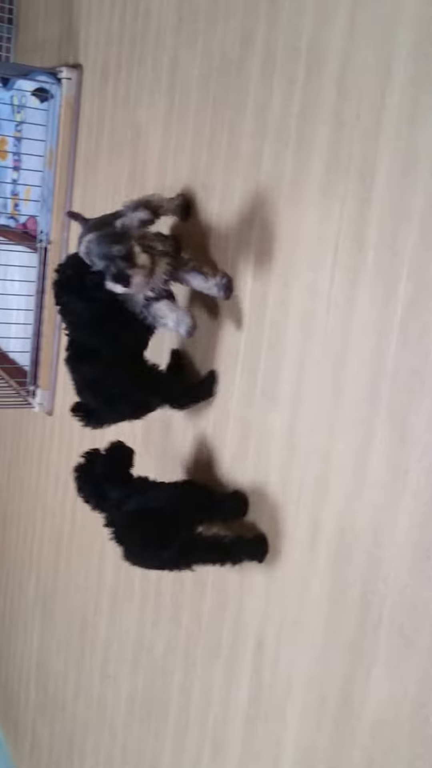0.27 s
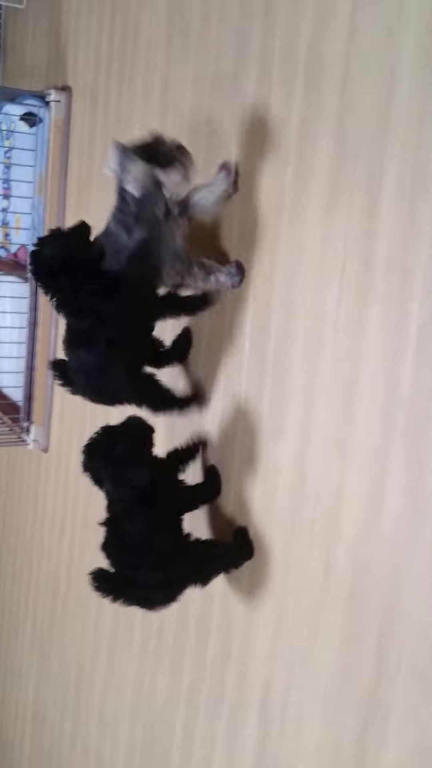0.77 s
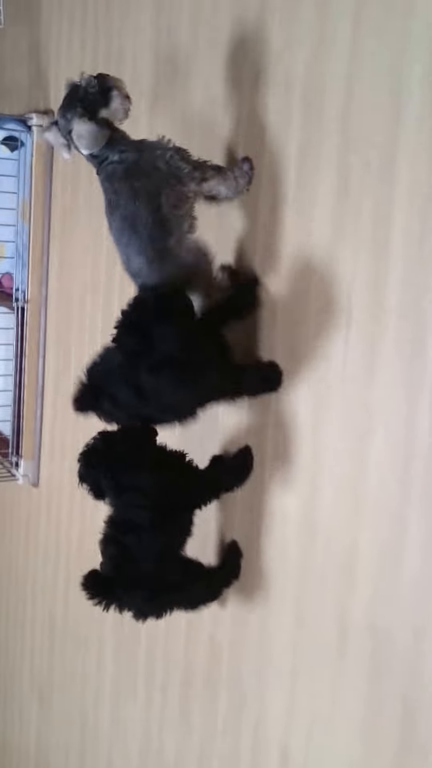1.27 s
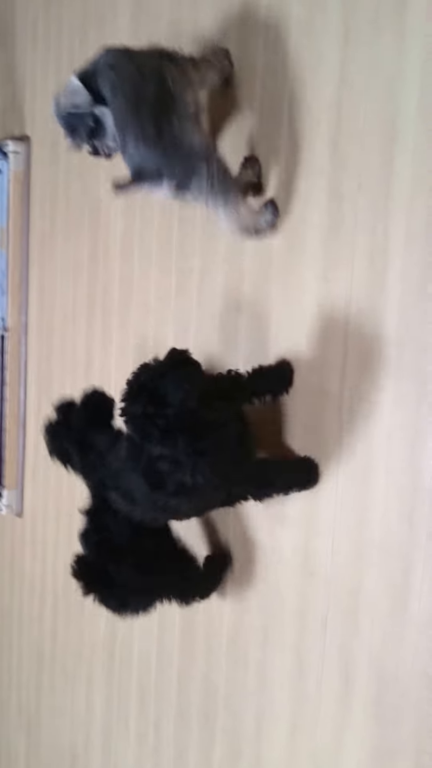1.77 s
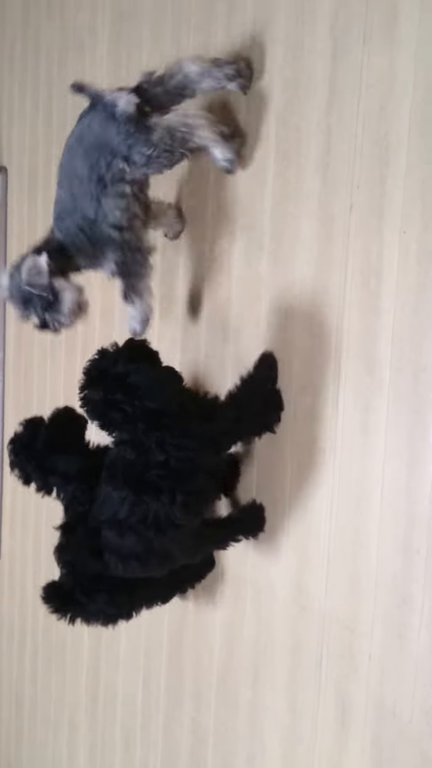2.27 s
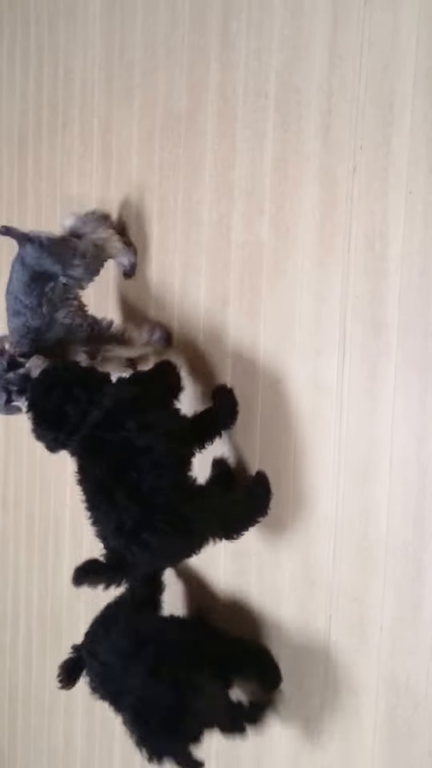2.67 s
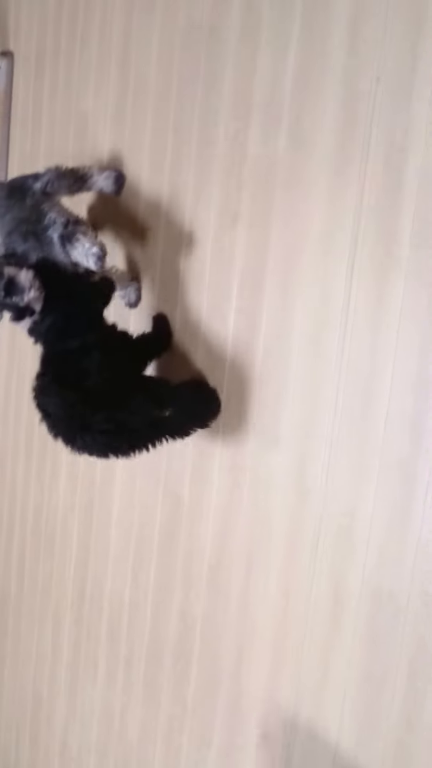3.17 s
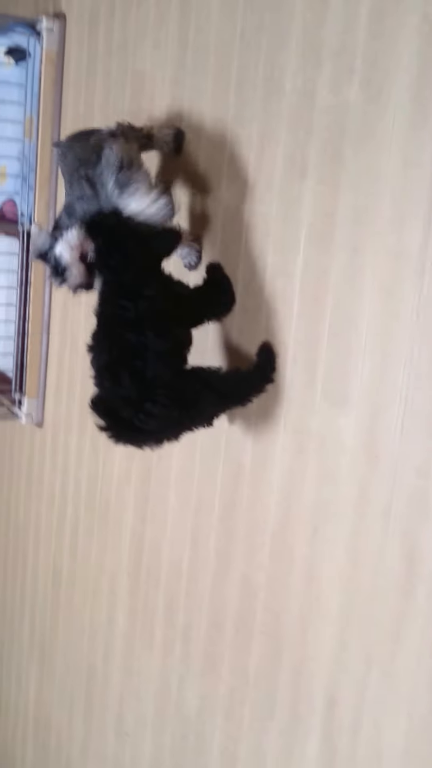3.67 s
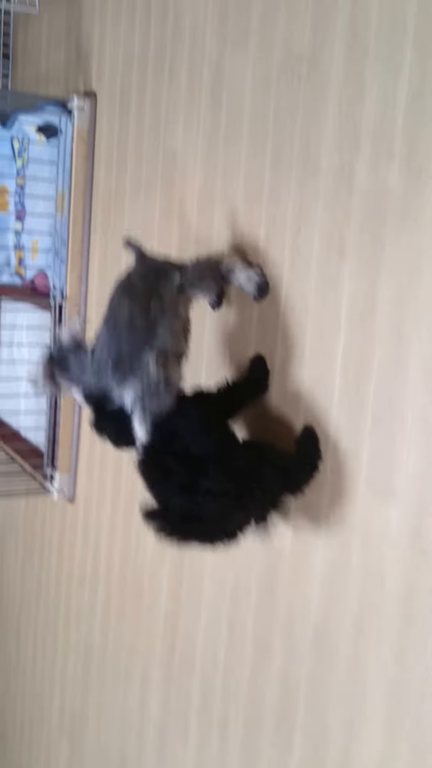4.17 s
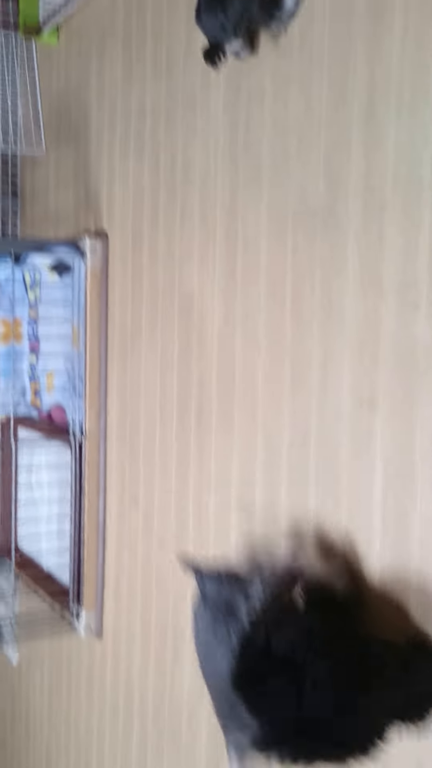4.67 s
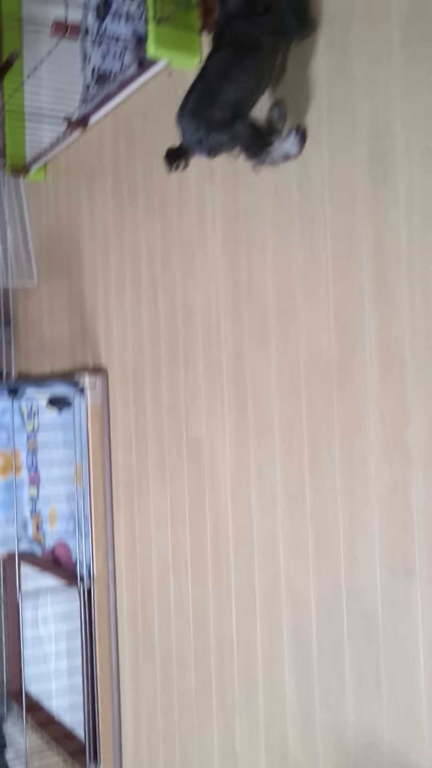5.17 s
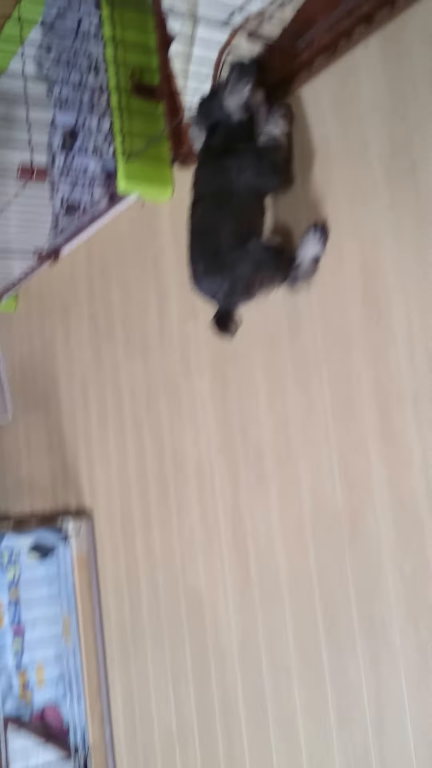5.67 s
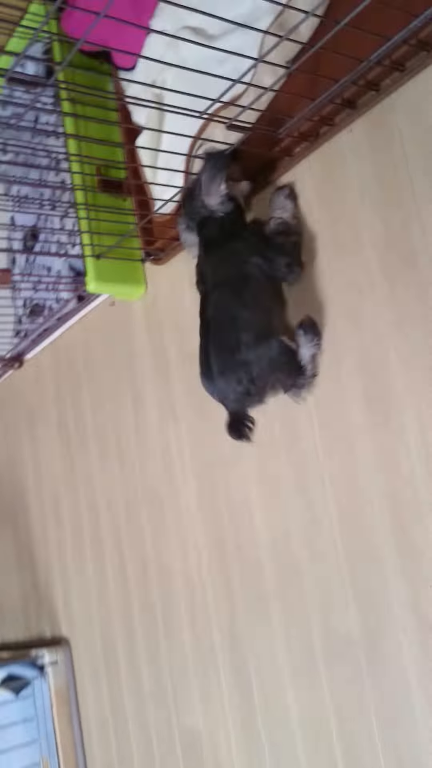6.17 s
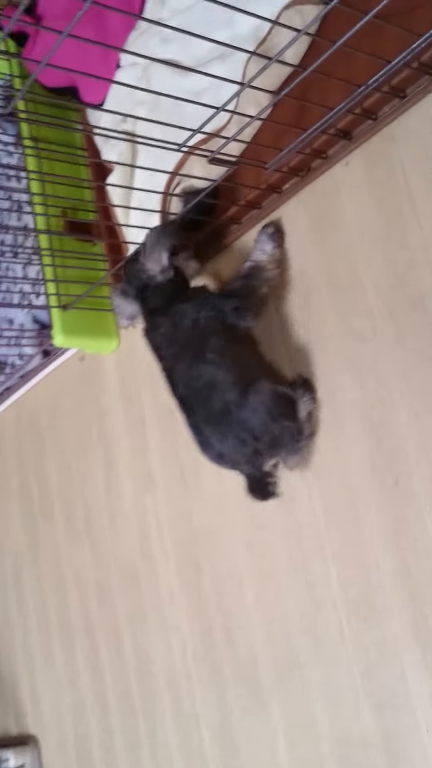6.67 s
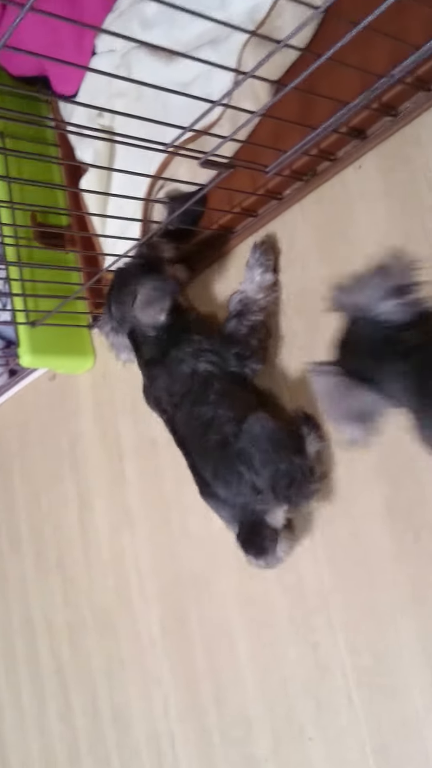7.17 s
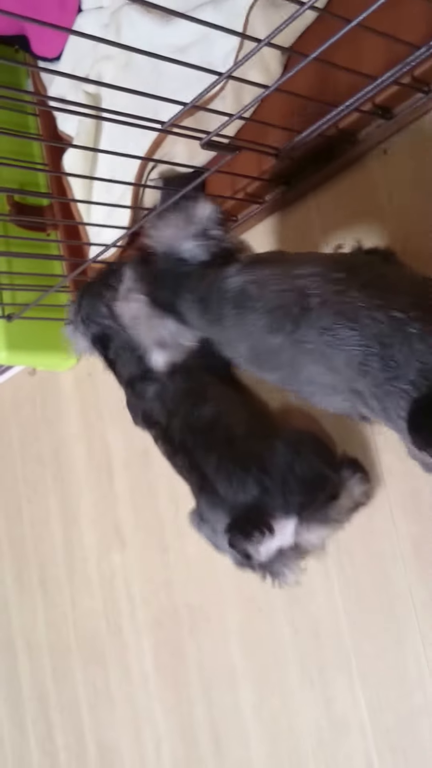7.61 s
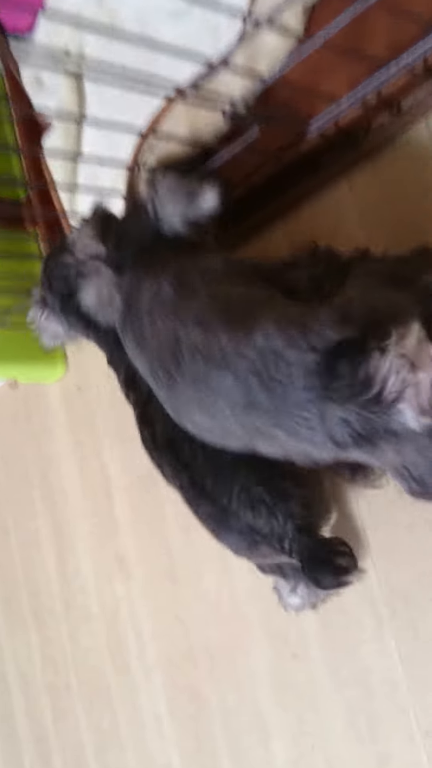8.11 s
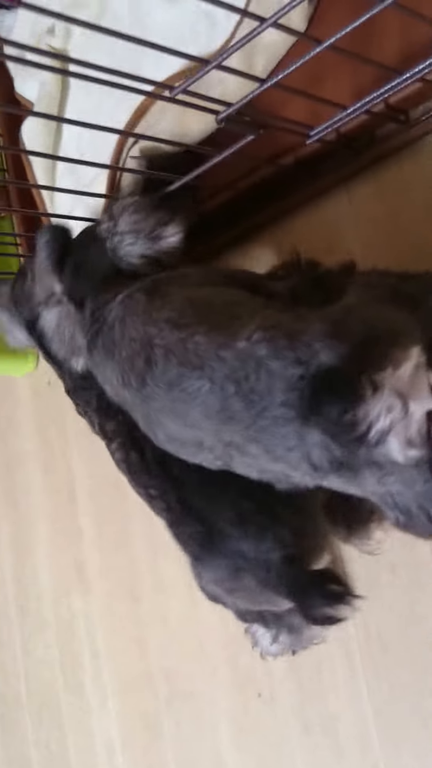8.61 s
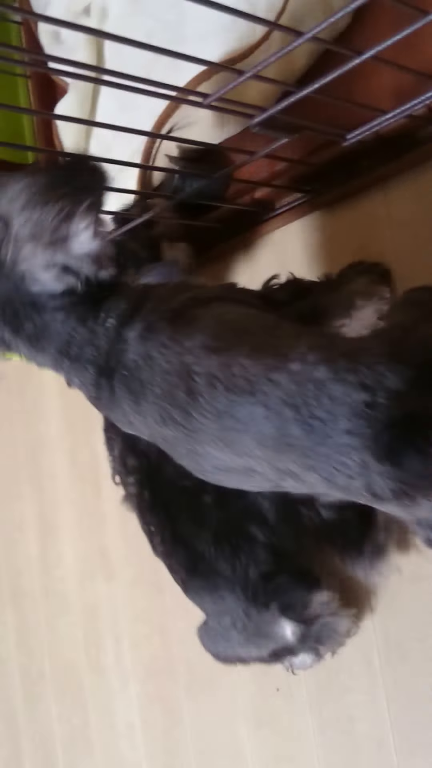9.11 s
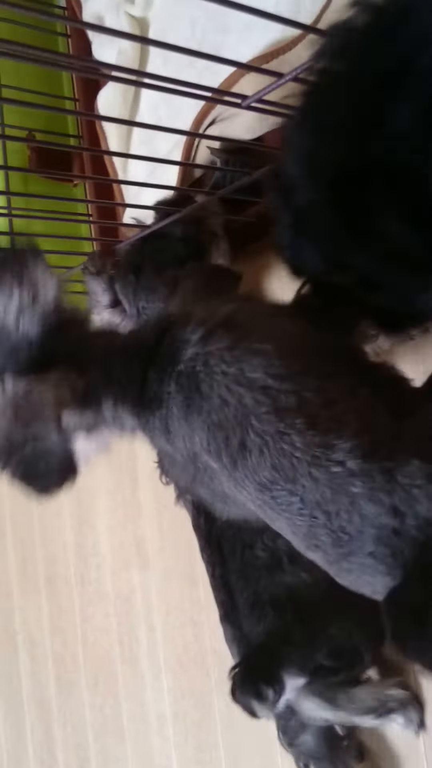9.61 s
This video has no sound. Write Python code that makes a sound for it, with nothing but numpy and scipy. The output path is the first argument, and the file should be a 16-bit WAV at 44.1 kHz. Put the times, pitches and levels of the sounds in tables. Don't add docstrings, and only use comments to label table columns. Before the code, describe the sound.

In a bare room with a wooden floor, small puppies scamper a few steps from a hand-held stereo microphone. At once claws click and a hollow crate is bumped, rattling until about 0.3 seconds. Dull finger knocks on the device cluster around 0.4 to 0.6. From 0.6 to 3.5 quick irregular nail ticks, pad thuds and raking scratches come thickly, with a hard tap near 2.0 and bright clicks around 3.0. Steps become sparser from 3.5 to 5, then a loose run taps on to 6.2, with a narrow ringing scrape at the pen tray near 6. Light shuffling and faint squeaky scratches fill 6.3 to 7.3. Clicks gather again, strongest from 8.4 to 9.0 with a sharp strike near 8.8, then scattered taps to the end. Soft room air and low hand rumble continue throughout.

```python
import sys
import numpy as np
from scipy import signal
from scipy.fft import rfft, irfft, next_fast_len
from scipy.io import wavfile
from scipy.ndimage import uniform_filter1d, map_coordinates

SR = 44100
rng = np.random.default_rng(int(sys.argv[2]) if len(sys.argv) > 2 else 0)


def decibels_to_gain(level_db):
    exponent = np.asarray(level_db, float) / 20
    return 10 ** exponent


def unload_audio(sound):
    columns = np.transpose(np.atleast_2d(sound))
    steps = np.round(np.clip(columns, -1, 1) * 32767)
    wavfile.write(sys.argv[1], SR, steps.astype(np.int16))


N = 434385


def unit(x):
    return x / np.sqrt(np.mean(x ** 2) + 1e-20)


def along(points, hz):
    f, v = np.transpose(points)
    return np.interp(np.log(hz + 1), np.log(f + 1), v)


def curves(rows):
    s, *cols = np.transpose(rows)
    return np.array([np.interp(np.arange(N) / SR, s, c) for c in cols])


def wobble(rate):
    knots = rng.standard_normal(int(N * rate / SR) + 4)
    return map_coordinates(knots, [np.arange(N) * rate / SR])


def filtered(x, response):
    m = next_fast_len(x.shape[-1] + 8192)
    return irfft(rfft(x, m) * response(np.fft.rfftfreq(m, 1 / SR)), m)[..., :x.shape[-1]]


def resonance(modes, f):
    one = sum(decibels_to_gain(db / 2) * 1j * f * w / (c * c - f * f + 1j * f * w) for c, w, db in modes)
    return one ** 2 / np.sqrt(np.mean(abs(one) ** 4))


def grains(n, chance, spread_db):
    hits = rng.random(n) < chance
    spreads = np.minimum(rng.exponential(size=n), 3)
    return hits * decibels_to_gain(spread_db * spreads)


def strokes():
    plants = [(1.042, 2, -39.5, -33), (1.109, 20, -36.5, -40.5), (1.25, 2.4, -67, -49),
              (1.455, 22, -41.5, -37.5), (1.625, 1.5, -42.5, -49.5), (1.898, 36, -50, -45),
              (1.991, 5.2, -34, -31.5), (2.108, 45, -36.5, -47.5), (2.168, 2.8, -60, -47),
              (2.604, 23, -49, -45), (2.859, 1.5, -43.5, -42), (3.803, 7.9, -44.5, -51.5),
              (3.83, 38, -43.5, -50), (3.875, 39, -45, -37.5), (5.1, 4, -51.5, -71), (5.012, 6.9, -46, -52),
              (5.171, 3.1, -42, -42.5), (5.304, 8.7, -73, -45), (5.39, 16, -40, -53), (5.57, 1.6, -48, -44),
              (6.665, 25, -44, -55.5), (6.63, 37, -50, -76.5), (7.103, 61, -55.5, -67),
              (7.529, 29, -45, -83), (7.659, 2.1, -47, -58), (7.839, 3.7, -42.5, -51.5),
              (8.771, 1.5, -44, -33), (8.8, 41, -58, -47), (5.735, 5, -63, -48.5), (2.31, 2, -66, -48),
              (9.261, 3.3, -49.5, -57)]
    rakes = [(0.627, 20, -50, -49), (1.755, 13, -49, -52.5), (2.34, 47, -40.5, -42), (2.68, 220, -42, -54),
             (3.055, 3.8, -43.5, -47), (3.07, 29, -39, -48.5), (3.285, 2.5, -54.5, -66),
             (3.351, 40, -54.5, -78), (3.471, 39, -42.5, -38.5), (3.702, 41, -85, -122),
             (4.023, 2.6, -45.5, -71), (4.115, 2.4, -49.5, -52.5), (4.202, 15, -53.5, -82),
             (4.481, 22, -47, -79), (4.78, 6.3, -39, -39), (5.55, 11, -53.5, -81), (6.38, 7.4, -52, -80),
             (6.518, 50, -52, -83), (6.821, 11, -49.5, -59), (8.448, 72, -50.5, -53),
             (8.852, 19, -44.5, -37.5), (8.892, 2.3, -40.5, -50), (9.105, 2.6, -57, -75),
             (9.187, 9.2, -53.5, -80), (9.701, 3.3, -56, -58), (4.39, 6.1, -53, -74),
             (3.725, 2.2, -52.5, -60)]
    skates = [(.054, 1.3, -40, -36), (.29, 7, -54.5, -68), (4.65, 19, -48, -56), (0.693, 47, -45.5, -51.5),
              (0.786, 12, -36.5, -45.5), (0.969, 8.6, -36, -43), (1.138, 2.6, -44, -41.5),
              (1.356, 9.4, -38.5, -41.5), (1.491, 5.3, -36.5, -35.5), (1.827, 3, -66, -76),
              (2.914, 8.1, -40, -47), (2.945, 1.7, -43, -68), (3.94, 15, -40, -43),
              (4.699, 17, -42.5, -44.5), (5.696, 16, -45.5, -56), (5.782, 49, -35, -38.5),
              (5.955, 13, -44, -57), (6.147, 3.7, -43.5, -73), (6.183, 7.2, -38, -60),
              (6.895, 4.1, -49, -60), (7.356, 88, -45, -84), (7.743, 6.8, -44, -55),
              (7.953, 27, -36.5, -52), (8.122, 6.5, -45.5, -67), (8.181, 2.6, -50, -65),
              (8.479, 6.3, -40, -36.5), (8.623, 25, -38.5, -49.5), (8.684, 3.4, -40, -42.5),
              (8.961, 2.1, -61, -54), (9.385, 29, -42.5, -57.5), (9.513, 2.7, -48.5, -59)]
    # board, scratch and nail dB over the claw level
    kinds = (plants, (-1.2, -3.5, -5)), (rakes, (-4, 2, 0)), (skates, (-3, -2.5, 0.4))
    t = np.arange(5000) / SR
    blows = np.zeros((4, N + len(t)))
    for table, (board_db, scratch_db, nail_db) in kinds:
        for s, rise_ms, claw, pad in table:
            rise = rise_ms / 1000 + 1e-4
            press = np.where(t < rise, 0.17 + 0.87 * (t / rise) ** 0.67, decibels_to_gain(-60 * (t - rise) / 0.19))
            chatter = 0.5 + 2.75 * grains(len(t), 0.01, 2.13)
            force = np.sqrt(1 + 0.008 / (rise + 0.073))
            rub = force * press * unit(chatter) * rng.standard_normal((4, len(t)))
            levels = decibels_to_gain([claw + board_db, pad, claw + scratch_db, claw + nail_db])
            start = round(s * SR)
            blows[:, start:start + len(t)] += levels[:, None] * rub
    return decibels_to_gain([[2.5], [5], [2.5], [2.5]]) * blows[:, :N]


def ticks(rub):
    press = np.sqrt(abs(uniform_filter1d(rub ** 2, size=256)))
    sizes = decibels_to_gain(7) * grains(N, 600 / SR, 1.3)
    balance = np.array([[0.8], [0.3], [0.9], [1.1]])
    return press * sizes * rng.standard_normal((2, 4, N)) * balance


def clicks(table, t60, width, db):
    rise_s, first_blow, broad_edge, blunt_hz = 0.00031, 1.17, 0.13, 12100
    s, peak_db, hz = np.transpose(table)[:, :, None, None]
    t = np.arange(1024) / SR
    f = np.fft.rfftfreq(len(t), 1 / SR)
    rough = rng.standard_normal((len(table), 2, len(t)))
    crack = decibels_to_gain(-60 * t / t60) * (1 - np.exp(-t / rise_s)) * rough
    crack[..., 0] = first_blow * np.sign(rough[..., -1]) * np.sqrt(SR / hz[..., 0])
    damping = 1j * f * width * hz
    ring = damping / (hz ** 2 - f * f + damping)
    blunt = (1 + 1j * f / blunt_hz) ** 2
    crack = irfft(rfft(crack) * ring * (ring + broad_edge) / blunt)[..., :len(t) // 2]
    crack *= decibels_to_gain(peak_db + db) / abs(crack).max(axis=2, keepdims=True)
    out = np.zeros((2, N + len(t)))
    for start, one in zip(np.round(s.ravel() * SR).astype(int), crack):
        out[:, start:start + one.shape[1]] += one
    return out[:, :N]


def flat_taps():
    # t/s, peak level/dB, f/Hz
    flat = [(0.798, -39, 2800), (0.798, -31.5, 3370), (0.971, -31, 3440), (1.02, -26, 1950),
            (1.043, -24, 1610), (1.106, -29, 958), (1.121, -26, 958), (1.345, -33, 920), (1.357, -27, 1040),
            (1.465, -25, 2860), (1.464, -27, 1000), (1.629, -26, 2510), (1.758, -32, 2130),
            (1.879, -38, 1930), (1.9908, -33, 1500), (1.921, -39, 802), (1.9958, -13.5, 2450),
            (2.124, -29, 2650), (2.177, -24, 2750), (2.344, -34, 875), (2.38, -30.5, 890),
            (2.625, -33, 980), (2.863, -35, 1810), (2.915, -21, 1007), (3.06, -25, 3530),
            (3.114, -21.5, 3730), (3.476, -34, 875), (3.493, -27.5, 796), (3.519, -22.5, 3260),
            (4.499, -34, 3320), (4.706, -36, 750), (4.786, -27, 860), (5.018, -36, 2320),
            (3.068, -23, 2100), (5.179, -30, 3060), (5.359, -29, 2500), (5.399, -29, 2450),
            (5.572, -35, 910), (5.781, -32, 905), (5.1, -34.5, 2400), (5.801, -25, 870), (5.968, -40, 2430),
            (6.001, -30, 2430), (6.191, -30.5, 2750), (6.676, -41, 1980), (7.744, -36, 1010),
            (7.845, -29.5, 2400), (7.96, -40, 2350), (7.973, -27, 2420), (8.184, -32.5, 2240),
            (8.488, -30, 1500), (8.486, -28, 900), (8.625, -40, 2750), (8.642, -26.5, 2240),
            (8.685, -29, 2250), (8.772, -17.5, 1300), (8.845, -29, 920), (8.864, -24, 860),
            (0.87, -31, 5200), (1.346, -36, 2300), (1.708, -37, 7500), (1.9953, -16.5, 1100),
              (2.717, -30, 6400), (2.716, -25, 9650), (3.2, -34, 1440), (3.0975, -26, 7800),
              (3.6, -27, 8100), (3.8, -27, 10000), (4.914, -47, 9050), (4.7, -47, 5300),
              (8.7719, -18.5, 2040), (8.7716, -19, 4400), (8.7718, -23, 600), (.699, -29, 8100),
              (5.1, -36, 2990), (6.004, -28, 3200)]
    return clicks(flat, t60=0.013, width=0.6, db=-1)


def tip_taps():
    # t/s, peak level/dB, f/Hz
    tips = [(0.0387, -46.5, 7400), (0.0553, -24, 6100), (0.0777, -29, 6130), (0.0957, -25.5, 7340),
            (0.6265, -51, 6900), (0.6424, -38, 6100), (0.6564, -28, 6280), (0.698, -28, 7300),
            (0.7324, -19, 6400), (0.7536, -25, 6300), (0.779, -28, 5800), (0.796, -21.5, 6500),
            (0.8586, -32, 6670), (0.9794, -38, 6640), (0.9826, -13, 6250), (1.1303, -43, 6760),
            (1.1313, -36, 6310), (1.1385, -18.5, 6370), (1.3623, -34, 7000), (1.3625, -24, 5640),
            (1.3798, -18.5, 6500), (1.4631, -37, 4270), (.128, -30.5, 2200), (1.497, -37, 6040),
            (1.5209, -34, 6150), (1.5384, -18, 6060), (1.6282, -29, 7300), (3.2864, -48, 1300),
            (1.7796, -25.5, 6300), (1.831, -33, 7220), (1.921, -29.5, 4400), (1.998, -36, 4170),
            (1.9984, -23.5, 7000), (2.3825, -31, 2500), (2.915, -26, 3000), (2.364, -22, 8900),
            (2.3825, -15.5, 6200), (2.4204, -24, 6300), (2.627, -39, 6910), (2.6838, -36, 5400),
            (2.686, -28.5, 4650), (2.6843, -28, 7160), (2.7267, -34, 6800), (2.7243, -20, 6800),
            (2.7716, -39, 6490), (2.779, -26, 6320), (2.807, -24, 6330), (2.8629, -35, 4160),
            (2.919, -43, 4180), (2.9216, -43, 7300), (2.9415, -25, 9100), (2.9512, -17.5, 7480),
            (3.1125, -22, 8700), (3.089, -22, 6410), (3.1123, -14.5, 6560), (3.2864, -39, 4260),
            (3.4784, -43, 6500), (3.441, -41, 9500), (3.5087, -17, 6950), (3.514, -18, 6350),
            (3.8037, -33, 6680), (3.9548, -28, 6450), (4.0277, -33, 7150), (3.965, -31, 9000),
            (4.6438, -32, 6900), (8.866, -32, 10000), (4.7086, -35, 6600), (4.7879, -32, 9700),
            (4.8093, -23, 7100), (5.1781, -32.5, 7800), (5.269, -35, 6060), (5.4425, -32.5, 9500),
            (5.4266, -26, 7260), (5.443, -28, 6300), (5.704, -30, 6950), (5.085, -42, 990),
            (5.7892, -41, 6210), (5.8136, -38, 6390), (5.821, -27, 6380), (5.95, -28, 6650),
            (6.1873, -28, 7040), (7.3915, -32, 7850), (7.855, -30, 2600), (7.7596, -24, 6360),
            (7.842, -28, 5900), (8.9627, -40, 9500), (7.99, -28, 7800), (7.972, -23.5, 5800),
            (8.1043, -33, 5600), (8.4433, -29.5, 6400), (8.4796, -31, 6340), (8.53, -19.5, 6300),
            (8.6272, -38, 8400), (8.6272, -31, 6430), (8.633, -35, 6960), (8.6402, -28, 6370),
            (8.6841, -26, 6200), (8.7, -22.5, 6720), (8.7717, -13, 6300), (8.866, -25, 7230),
            (8.866, -26, 4430), (8.8957, -19, 5700), (8.9126, -14.5, 6600), (8.938, -27, 6950),
            (8.9633, -14.5, 5850), (8.987, -28, 6350), (9.189, -33, 6760), (9.4014, -27, 6250),
            (9.4074, -27, 7540), (9.4073, -26, 5960), (9.417, -17, 6360), (9.624, -38, 6370),
            (9.704, -39, 8290), (9.825, -28.5, 6600)]
    return clicks(tips, t60=0.011, width=0.35, db=-3.5)


def skids():
    # t/s, bustle level/dB, claws out/dB
    bustle = [(0.0, -48, -7.5), (0.55, -57.5, 2.5), (0.87, -50.5, -2), (2.63, -53, -1), (2.94, -41.5, -7),
              (3.26, -70, 6), (3.76, -58, -3), (4.0, -60, 4), (4.25, -59, -1), (6.06, -48.5, 4.5),
              (6.36, -55, -4.5), (6.69, -52.5, 6.5), (7.13, -61.5, -2.5), (7.95, -53.5, -4),
              (8.39, -53, -4), (8.81, -57, -3), (9.03, -52.5, -2.5), (9.85, -50, -2)]
    shuffle_db = [-7.5, -13, -7, -5.5]
    claws_out = [-0.047, -1.5, 0.97, 1]
    # t/s, level/dB
    raking = [
        (0, -18),
        (.15, -42),
        (.55, 2),
        (.66, 0.1),
        (3.0, 2),
        (5.9, 0.5),
        (7.0, 5),
        (9.85, 0),
    ]
    bustle_db, claws_db = curves(bustle)
    db = bustle_db + np.outer(claws_out, claws_db) + np.c_[shuffle_db]
    db[2] += curves(raking)[0]
    rub = (unit(grains(N, 0.02, 2)) + 0.5) * rng.standard_normal((4, N))
    return decibels_to_gain(db + 2.2 * wobble(40) + 2.2 * wobble(14)) * rub


def regions(x):
    # f/Hz, width/Hz, level/dB
    board = [(1930, 1300, 2.5), (2450, 640, 6)]
    pad = [(567, 160, -1.5), (796, 330, 4), (958, 91, -8), (1350, 1270, 2)]
    scratch = [(3470, 1450, -1), (4540, 2400, 3.5)]
    nail = [(6640, 1770, 9), (9190, 4200, -3.5), (12220, 2200, -10.5), (13600, 4800, -18.5)]
    # f/Hz, level/dB
    colour = [(200, -8.5), (420, -14), (700, -2.5), (5000, -3.5), (10000, -0.5), (12000, -9.5),
              (15800, -14.5)]

    def response(f):
        rings = np.array([resonance(modes, f) for modes in (board, pad, scratch, nail)])
        return decibels_to_gain(along(colour, f)) * rings

    return filtered(x, response).sum(-2)


def pen_tray(press):
    # t/s, level/dB
    at_pen = [
        (5.85, -40),
        (5.95, -1),
        (6.45, -10),
        (6.6, -33),
        (7.25, -32),
        (7.38, -8),
        (8.72, -6),
        (8.9, -22),
    ]
    near = decibels_to_gain(curves(at_pen)[0])
    tray = filtered(near * press[0], lambda f: resonance([(2430, 400, 0)], f))
    press[[0, 2]] /= 1 + 0.82 * near
    return press, tray


def squeals():
    # t/s, length/s, f/Hz, level/dB
    slips = [(1.015, 0.027, 1930, -42.5), (5.975, 0.022, 2480, -40.5), (6.676, 0.054, 1880, -45.5),
             (6.816, 0.054, 3540, -48.5), (7.17, 0.024, 584, -52), (1.998, 0.057, 1600, -40.5),
             (6.7, 0.15, 2440, -52), (8.482, 0.043, 1580, -51), (7.969, 0.05, 2400, -42),
             (8.184, 0.042, 2360, -53), (8.641, 0.074, 2300, -46), (3.85, 0.027, 1680, -47)]
    out = np.zeros(N)
    for s, length, hz, db in slips:
        t = np.arange(int(length * SR)) / SR
        ring = filtered(rng.standard_normal(len(t)), lambda f: resonance([(hz, 0.18 * hz, 0)], f))
        swell = np.sin(np.pi * (t / length) ** 0.56)
        out[round(s * SR):][:len(t)] += decibels_to_gain(db + 4.5) * swell * unit(ring)
    return out


def crate():
    # t/s, level/dB, t60/s
    hits = [
        (0.053, -31, 0.28),
        (0.079, -42.5, 0.44),
        (0.198, -49.5, 0.61),
    ]
    # f/Hz, width/Hz, level/dB
    hollow = [(620, 420, 5), (725, 120, 6)]
    t = np.arange(SR) / SR
    envelope = sum((t > s) * decibels_to_gain(db - 60 * abs(t - s) / t60) for s, db, t60 in hits)
    shake = envelope * rng.standard_normal((2, SR))
    body = filtered(shake, lambda f: resonance(hollow, f))
    return decibels_to_gain(4) * np.pad(body, ((0, 0), (0, N - SR)))


def bumps():
    # t/s, peak level/dB, f/Hz, t60/s
    knocks = [(0.17, -24, 660, 0.0038), (0.439, -48, 336, 0.052), (0.455, -40, 685, 0.013),
              (0.467, -41, 336, 0.033), (.412, -47, 1800, 0.0057), (.447, -40, 810, 0.01),
              (.452, -44, 1900, .005), (.464, -40, 795, 0.012), (0.479, -45, 200, 0.035),
              (.512, -58, 180, 0.026), (0.532, -39, 163, 0.02), (.54, -34, 2200, .005),
              (0.5304, -31.5, 397, 0.019), (0.51, -31, 1500, 0.0046), (0.567, -37, 1400, .004),
              (5.18, -64, 80, 0.11), (5.625, -59.5, 220, .07), (5.679, -60, 152, 0.13),
              (6.685, -63, 168, 0.14), (6.799, -61, 246, 0.052), (6.9, -62, 332, 0.13),
              (7.481, -67, 86, 0.087), (1.997, -53, 302, .1), (8.362, -63, 253, 0.053),
              (9.575, -65, 159, 0.11), (0.492, -34.5, 526, 0.016), (0.51, -32.5, 398, 0.021),
              (0.524, -40, 453, 0.0088), (0.559, -47, 358, 0.013), (0.567, -30, 725, 0.0035),
              (0.4951, -25.5, 1870, 0.0053), (0.527, -26.5, 1500, 0.004), (0.535, -38, 2290, 0.0062)]
    out, t = np.zeros(N), np.arange(SR // 4) / SR
    for s, db, hz, t60 in knocks:
        envelope = decibels_to_gain(db + 9.5 - 60 * t / t60) * (1 - np.exp(-t / 0.00043))
        knock = envelope * np.sin(2 * np.pi * hz * t)
        span = out[round(s * SR):][:len(t)]
        span += knock[:len(span)]
    return out * np.array([[0.7], [-1.3]])


def room(x, early_db):
    # f/Hz, t60/s
    decay = [(300, 0.19), (1300, 0.36), (3500, 0.45), (9000, 0.31), (15000, 0.33)]
    step, size = SR // 5, SR // 4
    starts = range(0, N, step)
    hz, t, z = signal.stft(rng.standard_normal((2, len(starts), size)), SR, nperseg=256)
    fade = decibels_to_gain(-60 * t / along(decay, hz)[:, None])
    tails = signal.istft(z * fade, SR, nperseg=256)[1][..., :size]
    tails *= 1 + decibels_to_gain(early_db - 60 * np.arange(size) / (0.009 * SR))
    heard = rfft(tails)
    colour = uniform_filter1d(abs(heard) ** 2, size=70)
    tails = irfft(heard * (colour.mean(axis=(0, 1)) / colour) ** 0.4, size)
    tails[..., -SR // 50:] = 0
    tails /= np.linalg.norm(tails, axis=2, keepdims=True)
    out = np.zeros((2, N + step + size))
    for k, a in enumerate(starts):
        wet = signal.fftconvolve(x[None, a:a + step], tails[:, k], axes=1)
        out[:, a:a + wet.shape[1]] += wet
    return out[:, :N]


def floor():
    # f/Hz, level/dB per Hz
    air_tone = [(15, -42), (25, -18), (70, -13.5), (503, -1.5), (695, -2.5), (1560, -4), (2480, -5.5),
                (4490, -25), (6920, -8), (11300, -68), (14400, -33), (16000, -37)]
    # f/Hz, level/dB per Hz
    hand_tone = [(25, -11), (50, 1.5), (70, 9), (130, 3.5), (300, -3.5), (600, -32)]
    # t/s, level/dB
    rumble = [(0.0, -68), (0.13, -61), (0.38, -67), (0.49, -55), (0.93, -68), (1.9, -73.5), (2.9, -67),
              (4.5, -72.5), (5.2, -67), (5.9, -67), (6.5, -62.5), (6.9, -59), (7.3, -67), (8.2, -65.5),
              (8.9, -63), (9.85, -69)]
    air = unit(filtered(rng.standard_normal((2, N)), lambda hz: decibels_to_gain(along(air_tone, hz))))
    hand = unit(filtered(rng.standard_normal((2, N)), lambda hz: decibels_to_gain(along(hand_tone, hz))))
    air_level = decibels_to_gain(-59.5 + 1.3 * wobble(6.5))
    hand_level = decibels_to_gain(curves(rumble)[0] - 1.5 + 2.9 * wobble(5.3))
    return air_level * air + hand_level * hand


def diffuse(pair):
    # f/Hz, correlation
    alike = [(60, -0.77), (180, -0.7), (550, -0.56), (1650, 0.2), (4970, -0.025), (15000, 0.12)]

    def mid_side(hz):
        turn = np.arccos(np.clip(along(alike, hz), -1, 1)) / 2
        return np.array([np.cos(turn), np.sin(turn)])

    mid, side = filtered(pair, mid_side)
    return np.array([mid + side, mid - side])


def scene():
    press, tray = pen_tray(strokes())
    click = regions(ticks(press)) + flat_taps() + tip_taps()
    sliding = regions(skids() + press) + squeals() + tray
    far = room(sliding + decibels_to_gain(-2) * click[0], early_db=16.5)
    return bumps() + diffuse(click + far + crate() + floor())


def low_pass(x):
    return signal.sosfilt(signal.butter(12, 16500, fs=SR, output="sos"), x)


def record(dry):
    # f/Hz, left minus right level/dB
    balance = [(60, 3.5), (95, -2.5), (150, 0.5), (240, -1.5), (380, -2.5), (600, -2.5), (950, -5),
               (1500, -3), (2380, -4.5), (3770, -13.5), (5980, 6), (9470, 7.5), (15000, -13)]
    top_hz = 15950
    halves = np.array([[0.5], [-0.5]])
    ports = filtered(dry, lambda hz: decibels_to_gain(along(balance, hz) * halves) * (hz < top_hz))
    hz, _, z = signal.stft(ports, SR, nperseg=1024)
    near = uniform_filter1d(abs(z), size=6, axis=1)
    wide = uniform_filter1d(abs(z), size=40, axis=1)
    wide = wide ** 0.7 * np.median(wide, axis=2, keepdims=True) ** 0.3
    gate = along([(8500, 0), (10500, 0.78), (15000, 0.9)], hz)[:, None]
    z = z * np.where(near < gate * wide, 0.07, 1) * (hz < top_hz)[:, None]
    ports = signal.istft(z, SR, nperseg=1024)[1][:, :N]
    return low_pass(ports)


dry = scene()
out = record(dry)
unload_audio(out)
```